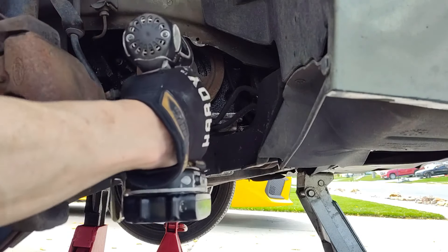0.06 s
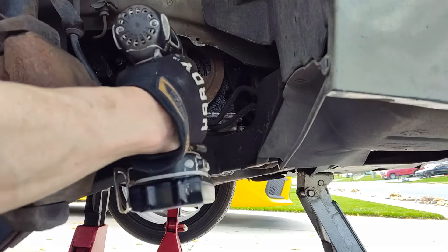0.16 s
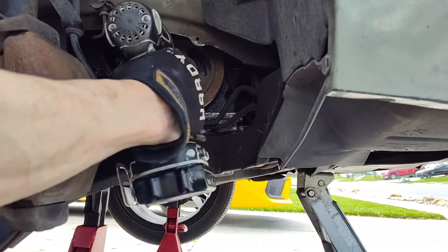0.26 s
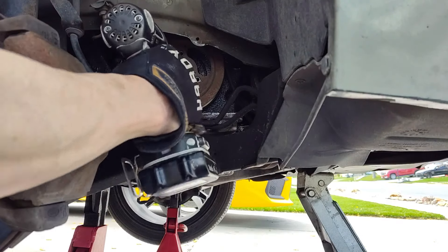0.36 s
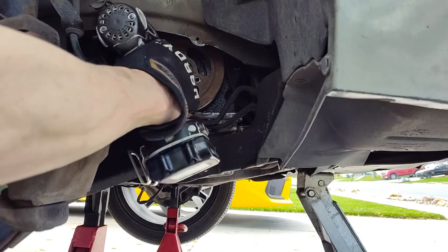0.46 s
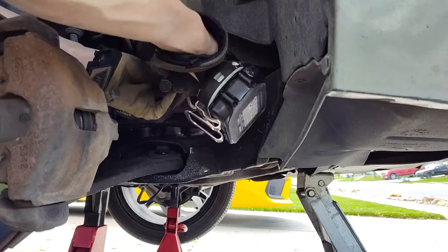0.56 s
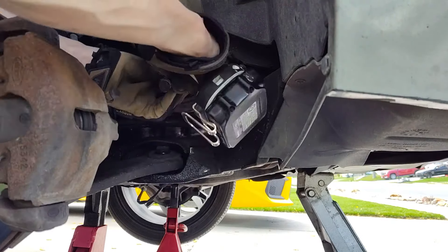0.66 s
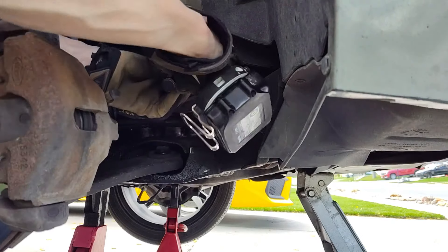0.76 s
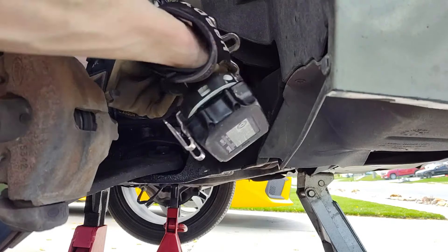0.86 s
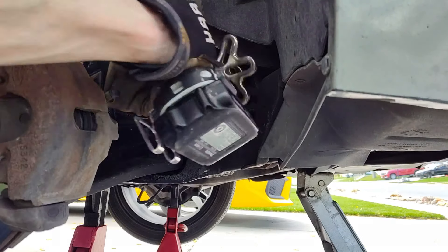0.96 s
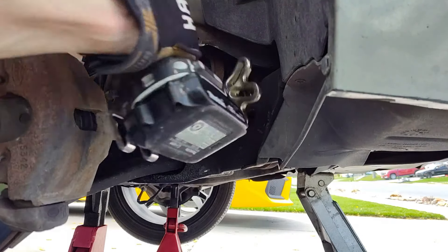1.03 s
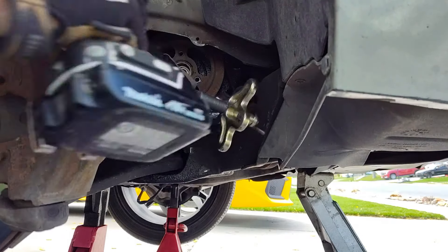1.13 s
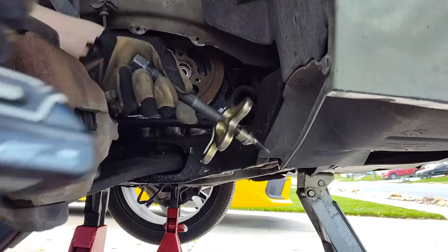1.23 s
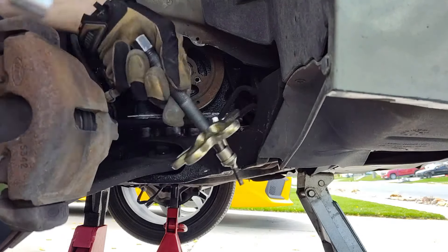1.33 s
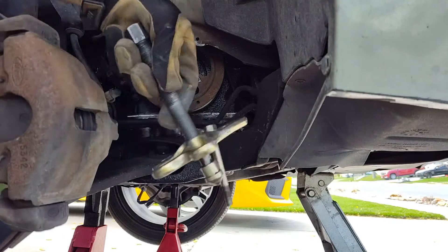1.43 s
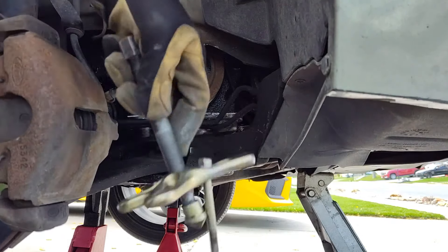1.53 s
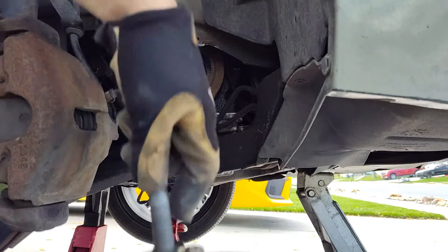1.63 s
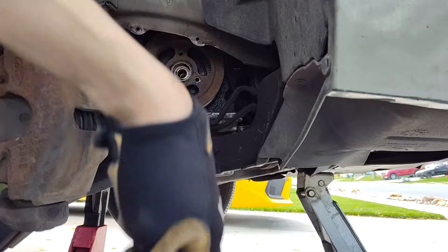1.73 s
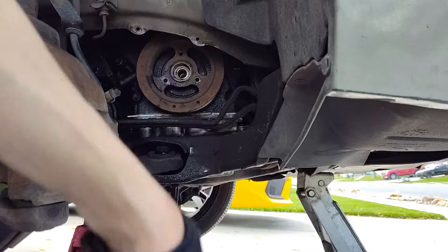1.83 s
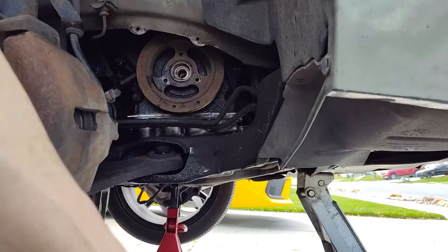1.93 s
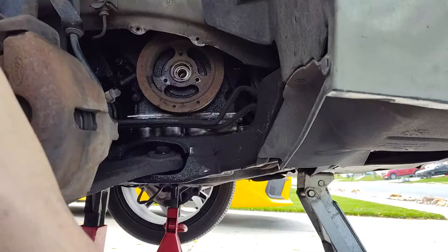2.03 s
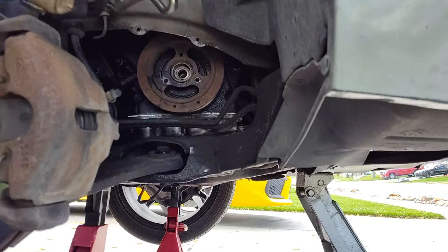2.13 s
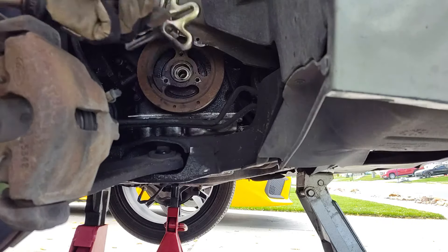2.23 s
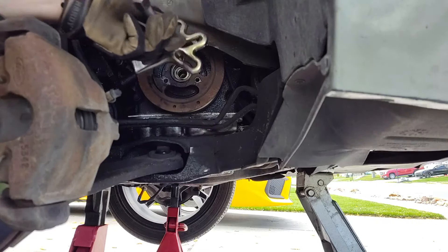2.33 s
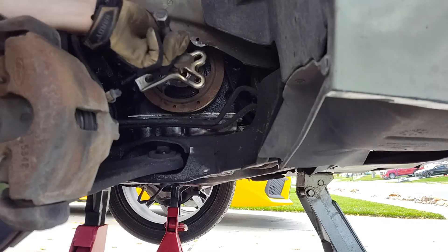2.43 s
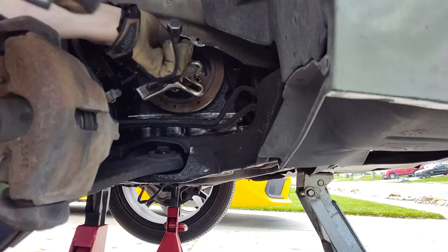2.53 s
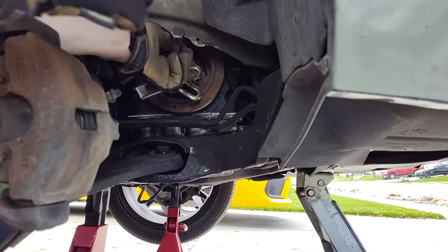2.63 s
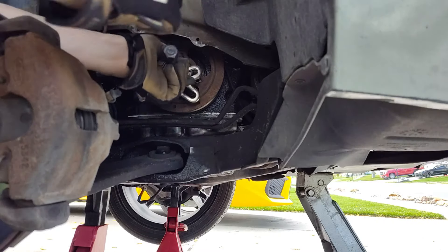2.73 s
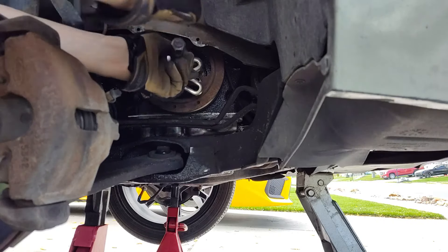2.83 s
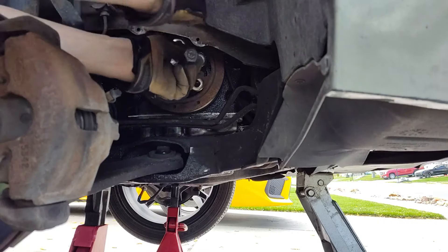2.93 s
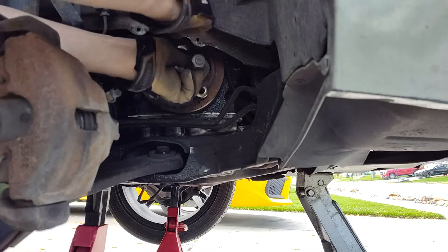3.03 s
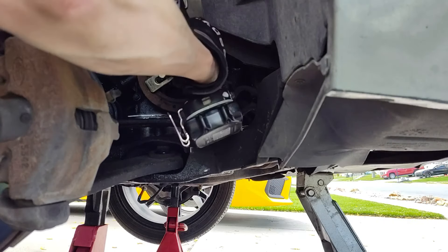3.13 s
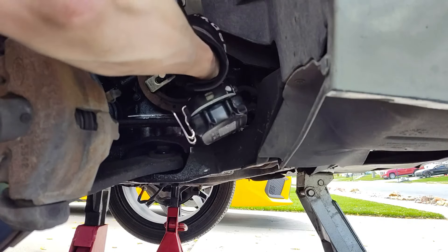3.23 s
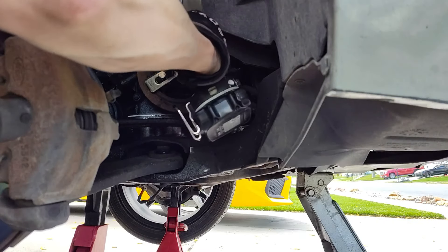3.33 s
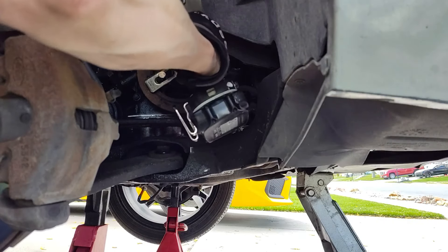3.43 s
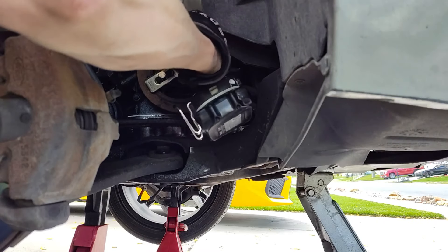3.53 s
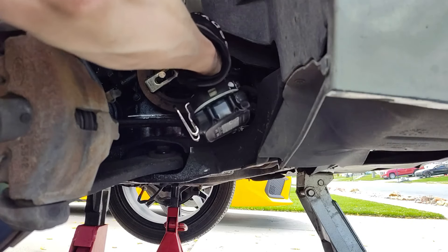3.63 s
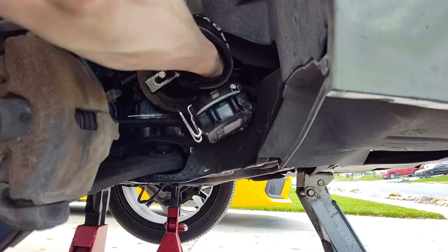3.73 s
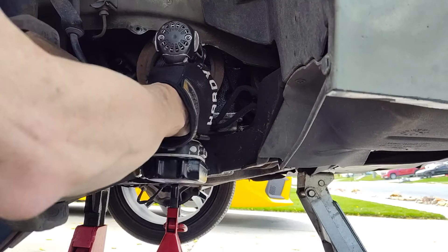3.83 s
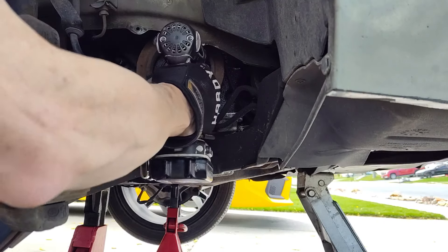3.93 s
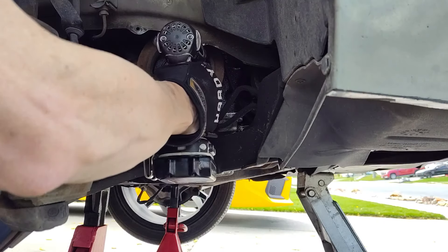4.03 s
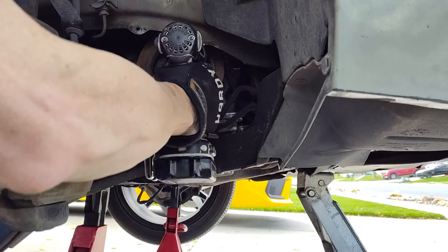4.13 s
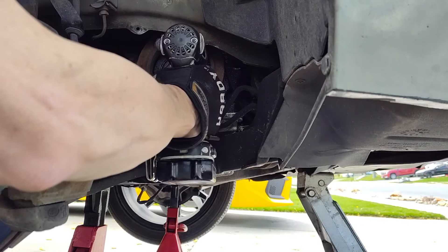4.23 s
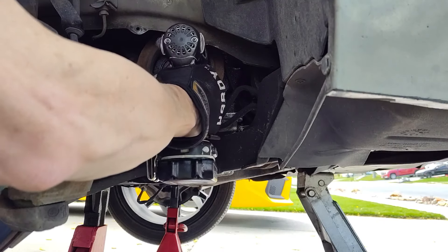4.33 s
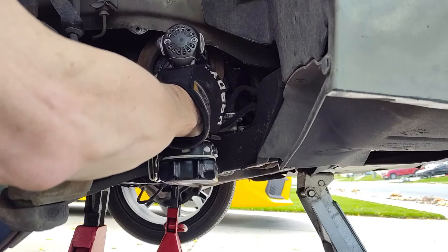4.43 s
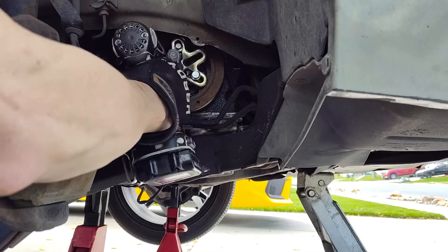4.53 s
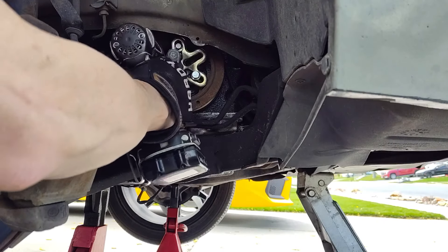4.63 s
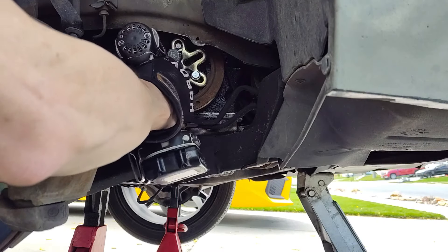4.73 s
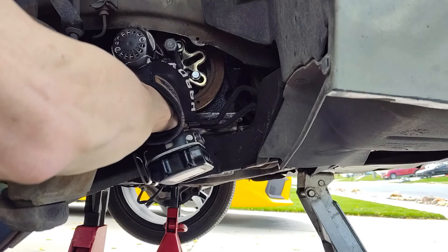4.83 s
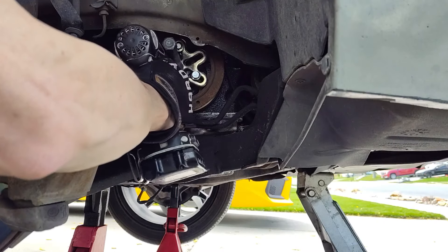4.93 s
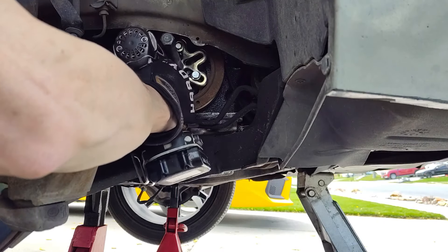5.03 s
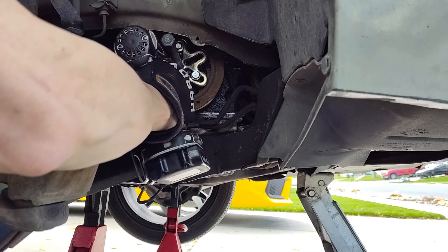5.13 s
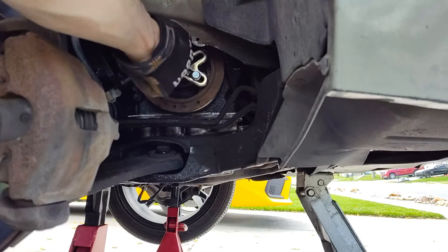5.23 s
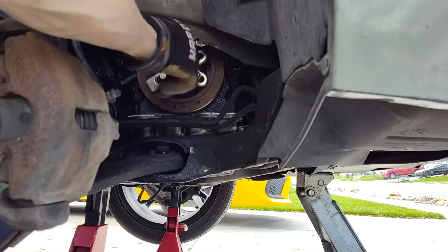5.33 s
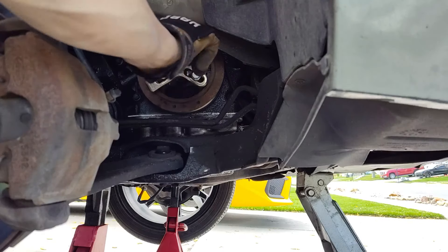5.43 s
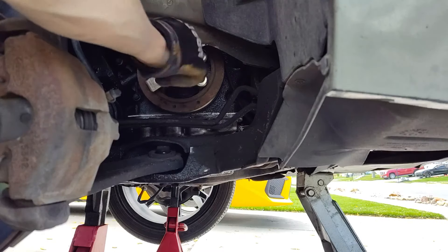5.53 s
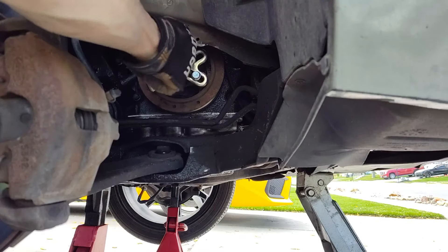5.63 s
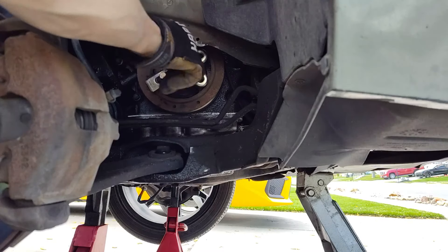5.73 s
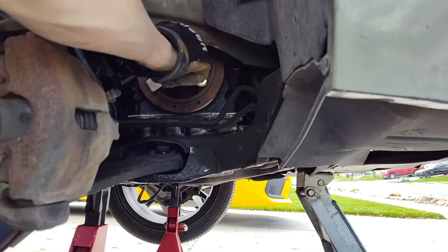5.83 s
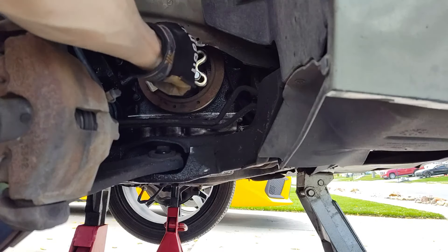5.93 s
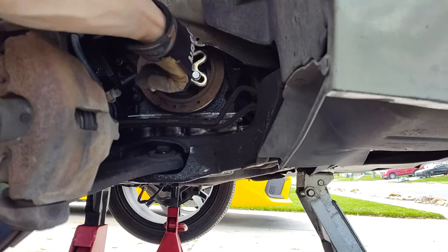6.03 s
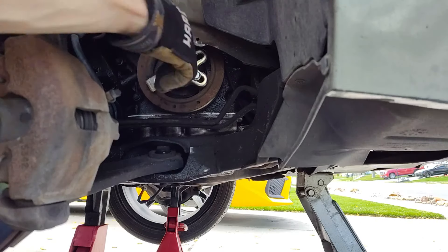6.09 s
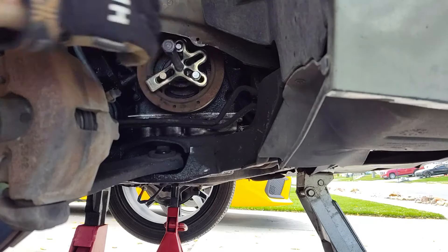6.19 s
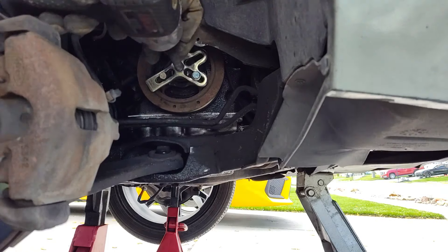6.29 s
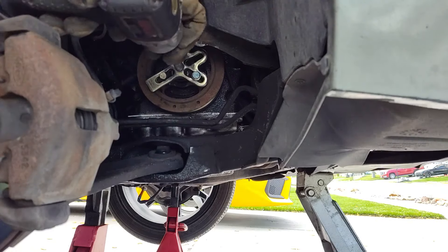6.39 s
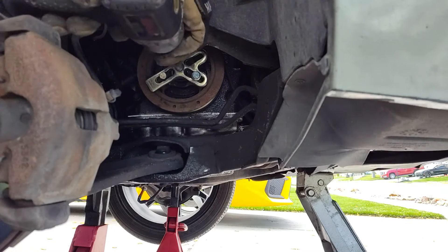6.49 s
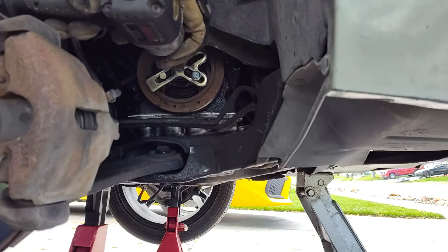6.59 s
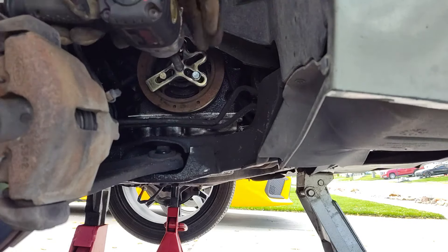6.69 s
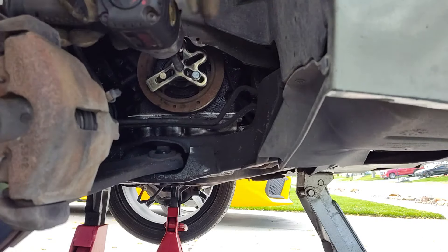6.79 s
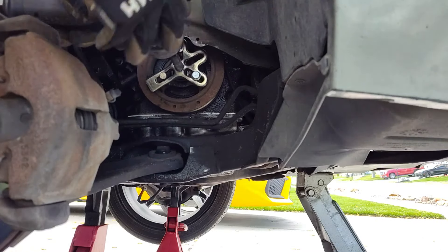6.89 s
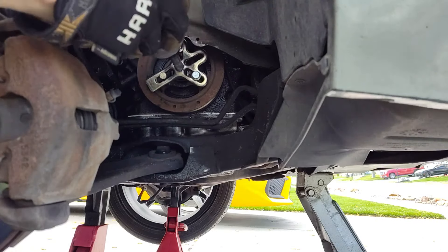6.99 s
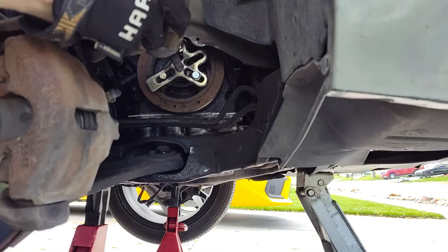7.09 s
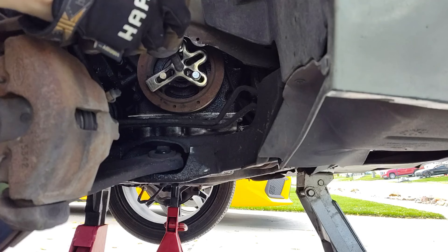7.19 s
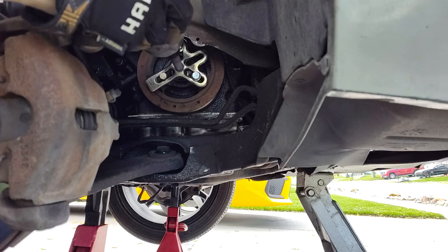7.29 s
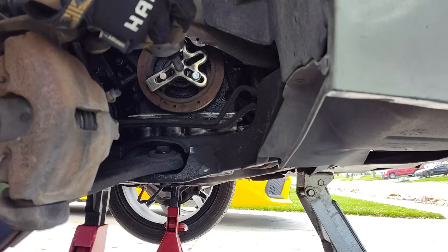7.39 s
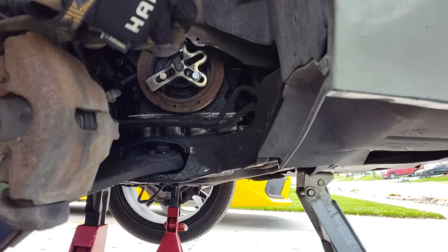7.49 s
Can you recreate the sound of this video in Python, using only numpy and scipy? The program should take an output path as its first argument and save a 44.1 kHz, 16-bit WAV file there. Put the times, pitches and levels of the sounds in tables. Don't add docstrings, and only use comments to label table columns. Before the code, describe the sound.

Close up under a raised car in an open garage, a steel puller's bolts clink and ring brightly while an impact wrench spins up briefly. After a quieter gap with a tool knock, three loud hammering bursts rattle on the bolts. Tools are then handled, a rubber boot creaks, low thuds bump the camera, and the wrench hammers unevenly again. Faint hiss and traffic rumble lie behind.

```python
import sys
import numpy as np
from scipy import signal
from scipy.fft import rfft, irfft, next_fast_len
from scipy.io import wavfile
from scipy.ndimage import uniform_filter1d, map_coordinates

SR = 44100
rng = np.random.default_rng(int(sys.argv[2]) if len(sys.argv) > 2 else 0)


def transcribe(u):
    v = np.clip(np.atleast_2d(u).T, -1, 1)
    q = np.round(v * 32767).astype(np.int16)
    wavfile.write(sys.argv[1], SR, q)


def ratio_of_db(decibels):
    return 10 ** (np.asarray(decibels, float) / 20)


N = 332955


def unit(x):
    return x / np.sqrt(np.mean(x ** 2) + 1e-20)


def along(points, hz):
    f, v = np.transpose(points)
    return np.interp(np.log(hz + 1), np.log(f + 1), v)


def curves(rows, outside=None):
    s, *cols = np.transpose(rows)
    return [np.interp(np.arange(N) / SR, s, c, outside, outside) for c in cols]


def wobble(rate_hz):
    knots = rng.standard_normal(int(N * rate_hz / SR) + 4)
    return map_coordinates(knots, [np.arange(N) * rate_hz / SR])


def filtered(x, response):
    m = next_fast_len(N + 8192)
    return irfft(rfft(x, m) * response(np.fft.rfftfreq(m, 1 / SR)), m)[..., :N]


def resonance(f, center_hz, width_hz):
    return 1j * f * width_hz / (center_hz ** 2 - f * f + 1j * f * width_hz)


def noise():
    return rng.standard_normal((2, N))


def spread(pair, spectrum):
    # hz, left_right_likeness
    likeness = [(40, 0.2), (120, .75), (400, 0.9), (1000, 0.6), (2000, 0.25), (5000, .15), (10000, 0.3)]

    def mid_side(hz):
        turn_rad = np.arccos(np.clip(along(likeness, hz), -1, 1)) / 2
        return ratio_of_db(along(spectrum, hz)) * [np.cos(turn_rad), np.sin(turn_rad)]

    mid, side = filtered(pair, mid_side)
    return unit(np.array([mid + side, mid - side]))


def add(out, s, x):
    part = out[..., round(s * SR):][..., :x.shape[-1]]
    part += x[..., :part.shape[-1]]


def bursts(rows, spike_db, spike_t60=0.017):
    # hz, level_db
    struck = [(50, -57), (120, -5.5), (350, -4.5), (1000, -1), (9000, 1), (11500, -5), (14200, -3.5),
              (14600, -36), (15500, -44), (15800, -120)]
    out, t = np.zeros((2, N)), np.arange(SR // 8) / SR
    for s, db, low_db, t60 in rows:
        rise = 1 - np.exp(-t / (.0009 if db > -30 else .003))
        for lo_hz, hi_hz, part_db, shared in ((348, 3500, low_db, 0.78), (3513, 13000, 0, 0.44)):
            hz = lo_hz + (hi_hz - lo_hz) * rng.random((30, 1)) ** 1.3
            late_s = np.maximum(t - 0.0033 * rng.random((30, 1)), 0)
            decay = ratio_of_db(rng.normal(0, 2, (30, 1)) - 60 * late_s / t60)
            modes = decay * np.sin(2 * np.pi * hz * late_s)
            band = signal.butter(2, [lo_hz, hi_hz], "band", fs=SR, output="sos")
            crackle = signal.sosfilt(band, rng.standard_normal((3, len(t))))
            crackle = 1.17 * (crackle[:2] + shared * crackle[2]) / np.hypot(1, shared)
            crackle *= ratio_of_db(12 - 60 * t / t60) + ratio_of_db(12 + spike_db - 60 * t / spike_t60)
            gains = rng.standard_normal((2, 30)) + shared * rng.standard_normal(30)
            near = gains * .6 / np.hypot(1, shared) @ modes
            add(out, s, ratio_of_db(db + part_db - 25.0) * (near + crackle) * rise)
    return filtered(out, lambda hz: ratio_of_db(along(struck, hz)))


def wrench():
    hits = blows()
    out = gearbox(hits[:, 0]) + free_spins() + hammer(hits) + trigger_click()
    return filtered(out, lambda f: 1 / (1 + (90 / (f + 1)) ** 6))


def gearbox(hit_s):
    # hz, db_per_hz
    gear_colour = [(60, -64), (120, -13), (200, -7.5), (842, -11.5), (1040, 0.5), (1310, 1.5), (1920, 1.5),
                   (2860, 5.5), (6000, -9), (7800, -22), (13200, -120)]
    fizz_colour = [(2060, -31), (3500, -7.5), (3960, -6), (4690, -3), (9950, 2.5), (11600, -6), (13800, -6),
                   (14500, -89), (15500, -110)]
    # press_s, spin_up_s, hold_s, coast_s, gearbox_db
    pulls = [(0.658, 0.09, 0.2, 0.1, -22), (0.906, 0.053, 0.088, 0.086, -33.5),
             (3.208, 0.11, 0.11, 0.021, -33), (3.407, 0.037, 0.29, 0.047, -22),
             (3.911, 0.084, 0.042, 0.058, -29.5), (4.091, 0.027, 0.089, 0.034, -51.5),
             (4.178, 0.048, 0.29, 0.027, -23), (4.533, 0.041, 0.029, .012, -72),
             (4.602, 0.011, 0.13, 0.087, -27.5), (4.813, 0.096, 0.32, 0.049, -24),
             (7.317, 0.039, 0.13, 0.058, -21)]
    # drone_hz, left_minus_right_db, fizz_over_gearbox_db, drone_over_gearbox_db
    grips = [(698, -1, 9, -4.5), (830, -2.5, 11, -6.5), (860, 0.3, 13, -8), (864, 0, 4.5, -9.5),
             (835, 2.5, 3, -15), (812, 3, -9, -6), (790, -1, 6, -11.5), (840, 1.5, 2, -29),
             (855, 1.5, 3.5, -7), (814, 0.5, 6.5, -18.5), (686, -0.9, 7, -10)]
    growls = [0.5, -4.5, 2, 2, -5, 6, 1, -1, -11, -1.5, 4.5]
    # peak_s, gearbox_db, drone_over_gearbox_db
    jolts = [(.672, -14.5, 9), (.94, -58, 10), (3.448, -22, -5), (3.975, -40.5, 1), (4.035, -39, -12),
             (4.046, -30.5, 4), (4.155, -47, 13), (4.227, -20.5, -9.5), (4.622, -24.5, -7),
             (4.733, -26.5, 0.5), (4.926, -15.5, -6), (5.248, -17.5, -19), (7.353, -13, -8)]
    split_hz, jolt_db_per_s, sag_db_per_s = 1900, 467, -5.5
    loud_power = 2.04
    now = np.arange(N) / SR
    body, fizz = spread(ticks(), gear_colour), spread(ticks(), fizz_colour)
    shake = noise() * ratio_of_db(4 * wobble(40))
    gain = rebound(hit_s)
    body, fizz = gain * unit(housing(body)), gain * unit(housing(fizz))
    growl = filtered(body, lambda f: 1 / (1 + (f / split_hz) ** 4))
    jolt = sum(ratio_of_db(db - jolt_db_per_s * np.abs(now - s)) for s, db, _ in jolts)
    lurch = sum(ratio_of_db(db + more_db - jolt_db_per_s * np.abs(now - s)) for s, db, more_db in jolts)
    out = np.zeros((2, N))
    for pull, grip, growl_db in zip(pulls, grips, growls):
        press_s, *stages_s, db = pull
        hz, lean_db, fizz_db, drone_db = grip
        speed = np.interp(now, np.cumsum([press_s, *stages_s]), [0, 1, 1, 0])
        loudness = speed ** loud_power * ratio_of_db(sag_db_per_s * np.clip(now - press_s, 0, 1))
        drone = spread(shake, [(hz / 12, -90), (hz / 3, -40), (hz * 0.69, -14), (hz * 0.85, -11), (hz, 0),
                               (hz * 1.285, -13), (hz * 17.0, -40), (hz * 12, -110)])
        chatter = ratio_of_db(3.5) * (body + (ratio_of_db(growl_db) - 1) * growl)
        steady = ratio_of_db(db) * (chatter + ratio_of_db(fizz_db) * fizz + ratio_of_db(drone_db + 1.0) * drone)
        lean = ratio_of_db([[lean_db / 2], [-lean_db / 2]])
        out += lean * loudness * (steady + jolt * (body + fizz) + lurch * drone)
    return out


def ticks():
    return jangling(4) * ratio_of_db(1.5 * wobble(900) + 1.3 * wobble(70))


def jangling(depth_db):
    z = signal.stft(noise(), nperseg=512)[2]
    flare = uniform_filter1d(rng.standard_normal(z.shape[1:]), size=6, axis=1)
    return signal.istft(z * ratio_of_db(depth_db * unit(flare)), nperseg=512)[1][:, :N]


def housing(x):
    # center_hz, width_hz, level_db
    bands = [(452, 30, 7), (1333, 126, 2), (2914, 250, -1), (2500, 550, -11), (4040, 217, 2),
             (5300, 900, -6), (8030, 1700, -6.5)]
    flutter_db = 1.5
    lifted = 0
    for center_hz, width_hz, db in bands:
        band = filtered(x, lambda f: resonance(f, center_hz, width_hz))
        lifted = lifted + ratio_of_db(db + flutter_db * wobble(35)) * band
    return x + lifted


def rebound(hit_s):
    t = np.arange(N) / SR
    k = np.clip(np.searchsorted(hit_s, t), 1, len(hit_s) - 1)
    gap_s = hit_s[k] - hit_s[k - 1]
    winding = np.clip((t - hit_s[k - 1]) / gap_s, 0, 1)
    hammering = (gap_s < .045) & (t > hit_s[0]) & (t < hit_s[-1])
    return ratio_of_db(np.where(hammering, 1.5 - 12 * winding ** .6, 0))


def free_spins():
    # time_s, mesh_hz
    spins = [
        [(.745, 2190), (.76, 2250), (.81, 2430), (.85, 2520), (.89, 2510), (.925, 2300), (.96, 2140)],
        [(3.295, 1470), (3.308, 1467), (3.322, 1790), (3.34, 1916), (3.36, 2037), (3.388, 2020), (3.408, 2030),
         (3.432, 1720), (3.442, 1500), (3.46, 1494)],
    ]
    tops = [
        -36,
        -33,
    ]
    return housing(sum(whine(spin, top_db) for spin, top_db in zip(spins, tops)))


def whine(spin, top_db):
    # multiple, level_db
    orders = [(.63, -8), (2, 3), (3, 1), (5, 0)]
    db_per_octave = 7
    now, mesh_hz = np.arange(N) / SR, uniform_filter1d(curves(spin)[0], size=500)
    spinning = (now > spin[0][0]) & (now < spin[-1][0])
    level_db = np.where(spinning, top_db + db_per_octave * np.log2(mesh_hz / mesh_hz.max()), -120)
    phase = 2 * np.pi * np.cumsum(mesh_hz * (1 + .003 * wobble(200))) / SR
    return sum(ratio_of_db(level_db + db + 2 * wobble(60)) * np.sin(k * phase) for k, db in orders)


def blows():
    # start_s, peak_db, low_part_db, bolt_ring_db
    trains = [(3.488, -6, -16, -45), (3.5165, -8, -21, -46), (3.545, -3.5, -19, -34),
              (3.5735, -0.5, -9, -35), (3.6037, -6.5, -5, -41), (3.6316, -3, -2, -36),
              (3.6596, -8, -11, -24), (3.69, -4.5, -7, -24), (3.7173, -10, -15, -36),
              (4.2349, -9, -4.5, -34), (4.265, 0.5, -25, -36), (4.2935, -5, -4, -24), (4.322, -1, -19, -30),
              (4.348, -8, -5, -30), (4.376, -2.5, -15, -21), (4.4014, -3.5, -13, -27),
              (4.426, -1, -1.5, -36), (4.45, -5.5, 1, -43), (4.474, 3, -7.5, -38), (4.4978, -6, -12, -36),
              (4.5212, 1, -10, -57), (4.9582, -1.5, -7, -28), (4.9847, -2, -20, -41),
              (5.012, -0.5, -17, -30), (5.0399, -3.5, -9, -30), (5.0638, -11, -16, -42),
              (5.0905, -9, -18, -44), (5.1168, 2.5, -34, -30), (5.141, -2.5, -10, -45),
              (5.1647, -9, -12, -30), (5.1888, -13, -17, -41), (5.216, -6, -27, -39), (5.24, -1.5, -2, -39)]
    # start_s, peak_db, low_part_db
    strays = [(3.441, -21, -9), (3.453, -2, 2), (3.481, -7, -19), (4.1889, -18.5, 9), (4.2035, -27, -7),
              (4.2214, -17.5, 19), (4.2291, -5.5, 2), (4.6098, -21, 22.5), (4.6225, -9.5, 4),
              (4.6458, -4, -3), (4.854, -14.5, 0), (4.918, -2, -24), (4.9248, -21, -17), (4.8765, -15, 7),
              (4.934, -27, -16), (7.342, -33, -7), (7.3671, -7, 9.5), (7.385, 0, -9), (7.4149, -6, 6.5),
              (7.428, -5, -16), (7.451, -1.5, 4), (7.4696, -27, -8), (7.5026, -6.5, -22)]
    rows = [(s, db - 1, low_db, ring_db) for s, db, low_db, ring_db in trains]
    return np.array(sorted(rows + [(*row, -40) for row in strays]))


def hammer(hits):
    # start_s, ring_db
    square = [
        (4.922, -20),
        (4.959, -17),
        (5.013, -17),
        (5.119, -18),
        (5.142, -23),
    ]
    bolt_hz, bolt_t60_s = 8250, .1
    out = bursts([(s, db + 1, low_db, .026) for s, db, low_db, _ in hits], spike_db=11, spike_t60=.009)
    t = np.arange(SR // 8) / SR
    for s, *_, db in [*hits, *square]:
        tone = np.sin(2 * np.pi * bolt_hz * t + rng.random((2, 1)) * 3)
        add(out, s, ratio_of_db(db - 60 * t / bolt_t60_s) * tone)
    return out


def trigger_click():
    # start_s, pitch_hz, level_db, t60_s
    s, hz, db, t60 = (3.226, 2900, -38, .045)
    out, t = np.zeros((2, N)), np.arange(SR // 8) / SR
    add(out, s, ratio_of_db(db - 60 * t / t60) * np.sin(2 * np.pi * hz * t))
    return out


def steel_ring(hz, db, t60):
    tremble_db, wander_rad, port_rad = 2, .03, 1.6
    t = np.arange(SR // 2) / SR
    tremble = tremble_db * np.sin(rng.uniform(124, 270) * t + 6 * rng.random())
    wander = wander_rad * np.cumsum(rng.standard_normal(len(t)))
    tone = np.sin(2 * np.pi * hz * t + wander + port_rad * rng.random((2, 1)))
    return ratio_of_db(db - 60 * t / t60 + tremble) * tone * (1 - np.exp(-t / 0.00023))


def puller():
    # start_s, crack_peak_db, low_ring_db, high_over_low_ring_db
    clinks = [(0.0004, -36, -29, -4), (0.0636, -1, -23, -4), (0.1348, -24, -30, -20), (0.2777, -9, -29, 1),
              (0.29, -14.5, -23, -1), (0.376, -24.5, -32, 1), (0.4274, -31, -44, 11),
              (0.4548, -15, -46, 24), (0.5077, -27, -52, 16), (0.595, -32.5, -61, 16),
              (0.9785, -29.5, -31, 5), (1.06, -20.5, -39, 4), (1.137, -29, -53.5, 9),
              (1.1873, -31.5, -71, 13), (1.2175, -23, -40, 10), (1.279, -10, -32, 13),
              (1.298, -20.5, -27, -25), (1.365, -24, -43, 5), (1.414, -25, -47, 2), (1.599, -33, -51, -5),
              (1.737, -25.5, -50, 3.5), (1.98, -34, -48.5, -7), (2.012, -29, -48, 2.5),
              (2.0387, -33, -56, -4)]
    # pitch_hz, level_db, t60_s
    on_hub = [
        [(4241, -3, .75), (4180, -20, 1)],
        [(8210, 0, 0.1)],
        [(8780, -1, 0.038)],
        [(10935, -4.5, 0.43), (11000, -17, 0.34), (10400, -20, 0.13)],
    ]
    lifted = [
        [(4212, 1, .45), (4236, -10, .4), (5606, -3, .14), (5660, -12, .15), (3460, -12, .07), (4820, -12, .07)],
        [(8232, 0, .2), (7400, -12, .1)],
        [(8904, 0, .1)],
        [(10862, 0, .32), (10812, -6, .45), (10500, -18, .3)],
    ]
    # start_s, ring_db
    long_bolt = [
        (0.0004, -27),
        (0.064, -30),
        (0.278, -19),
        (0.9798, -11),
        (1.06, -20),
        (1.2173, -35),
        (1.28, -21),
        (1.414, -58),
    ]
    short_bolt = [
        (0.0625, -15.5),
        (0.29, -11.5),
        (0.9785, -31),
        (1.136, -40),
        (1.1873, -28),
        (1.217, -23),
        (1.2778, -18.5),
        (1.414, -46),
    ]
    # pitch_hz, level_db, t60_s
    bend = [
        (2067, -22.5, 0.31),
        (2820, -19, 0.047),
        (3350, -42, 0.23),
    ]
    # time_s, level_db
    jingle = [
        (.7, -64),
        (.76, -39),
        (.97, -29),
        (1.03, -28),
        (1.1, -58),
    ]
    bend_at_s, ring_stops_s = .066, .597
    out, t = np.zeros((2, N)), np.arange(SR // 2) / SR
    for s, crack_db, ring_db, high_db in clinks:
        early = s < ring_stops_s
        if early:
            held_s = min([at for at, db, *_ in clinks if at > s and db > -25] + [ring_stops_s]) - s
        else:
            after_s = min([at for at, *_ in clinks if at > s + .025] + [N / SR])
            held_s = min(after_s - s, .085 if crack_db > -21 else .03)
        damp = ratio_of_db(-60 * np.maximum(t - held_s, 0) / (.02 if early else .14))
        for db, family in zip((ring_db, ring_db + high_db), (on_hub if early else lifted)[::3]):
            modes = [steel_ring(hz * (1 + rng.normal(0, 0.00011)), db + rel_db + 8.0 + rng.normal(0, 1.0), t60)
                     for hz, rel_db, t60 in family]
            add(out, s, damp * sum(modes))
    for strikes, hub_modes, free_modes in zip((long_bolt, short_bolt), on_hub[1:], lifted[1:]):
        for s, db in strikes:
            modes = hub_modes if s < ring_stops_s else free_modes
            add(out, s, sum(steel_ring(hz, db + rel_db + 2.5, t60) for hz, rel_db, t60 in modes))
    add(out, bend_at_s, sum(steel_ring(*mode) for mode in bend))
    shaken = noise() * ratio_of_db(5 * wobble(60))
    free = sum(lifted, [])
    steel = filtered(shaken, lambda f: sum(ratio_of_db(db) * resonance(f, hz, 30) for hz, db, _ in free))
    out += ratio_of_db(curves(jingle, -120)[0]) * unit(steel)
    cracks = [(s, db + 4.0, -8 if s < .2 else -14, .06) for s, db, *_ in clinks]
    return out + bursts(cracks, spike_db=-3)


def knocks():
    # start_s, peak_db, low_part_db, t60_s
    touches = [(.001, -48, -1, .5), (.049, -31, -12, .06), (.367, -35, -25, .08), (1.228, -29, -25, .06),
               (1.332, -20.5, -25, 0.15), (2.8077, -19, -12.5, 0.05), (3.914, -30, -2, 0.19),
               (4.071, -36, 20, 0.079), (4.1094, -42, 18, 0.065), (4.151, -40.5, 22.5, 0.053),
               (5.3174, -34, 6, 0.066), (6.3244, -51.5, 12, 0.16), (6.4157, -45.5, 12.5, 0.066),
               (6.569, -24, 8.5, 0.13), (6.597, -36.5, 21.5, 0.046), (6.7266, -32.5, 10.5, .25),
               (6.7489, -9.5, 10.5, 0.066), (6.7665, -22, 13, 0.11), (6.9894, -29.5, -28, 0.27)]
    return bursts(touches, spike_db=11, spike_t60=.03)


def handling():
    # start_s, peak_db, pitch_hz
    thuds = [(2.559, -36, 89.5), (2.849, -38, 107), (5.738, -32, 110), (5.87, -34, 84), (6.073, -46, 86.1),
             (6.158, -37, 91), (6.31, -33, 75.4), (6.511, -34, 142), (6.743, -28, 167), (6.94, -32, 112),
             (7.096, -36, 161), (7.175, -22.5, 105), (7.199, -23.5, 96), (7.298, -23.5, 98.6),
             (7.342, -9.5, 190), (7.355, -10.5, 195), (7.414, -14.5, 150.4), (7.482, -16.5, 130),
             (7.521, -16, 172)]
    out, t = np.zeros((2, N)), np.arange(SR // 8) / SR
    for s, db, hz in thuds:
        level = ratio_of_db(db + 4 - 60 * t / .075) * (1 - np.exp(-t / .005))
        port_rad = [[0], [rng.choice([-.7, .7])]]
        add(out, s, level * np.sin(2 * np.pi * hz * t + port_rad))
    return out


def creak():
    # time_s, slip_rate_hz, resonance_hz, level_db
    slips = [
        (7.08, 163, 1290, -50),
        (7.12, 140, 1425, -43.5),
        (7.17, 220, 1460, -39.5),
        (7.23, 69, 1510, -42.5),
        (7.27, 43, 1550, -52),
    ]
    rate_hz, hz, _ = curves(slips)
    cycle = np.cumsum(rate_hz * (1 + 0.1524 * wobble(87))) / SR % 1
    phase = 2 * np.pi * np.cumsum(hz) / SR

    def rough(knots_hz):
        return np.array([wobble(knots_hz), wobble(knots_hz)])

    tone = (.7 + rough(300)) * np.sin(phase)
    tone += rough(900) * np.sin(1.5 * phase)
    tone += ratio_of_db(-4) * rough(900) * np.sin(2.05 * phase)
    return ratio_of_db(curves(slips, -120)[2]) * (0.5 + np.sin(np.pi * cycle) ** 2) * tone


def outdoors():
    # hz, db_per_hz
    rumble_colour = [(13, -40), (22, -20.5), (102, -2), (231, -12), (325, -27), (395, -31), (500, -20),
                     (650, -87), (1100, -120)]
    street_colour = [(50, -38), (120, -10), (200, 0.5), (519, 0), (1250, -4), (1820, -3), (3700, -9),
                     (4260, -7), (6000, -8.5), (7800, 1.5), (13200, -120)]
    hiss_colour = [(1470, -47), (2500, -19), (2780, -12), (3610, -13.5), (6390, -5.5), (7160, -6),
                   (8470, 3.5), (11300, -7), (14200, -9.5), (15500, -98)]
    # time_s, rumble_db
    traffic = [
        (0.0, -45),
        (0.24, -52.5),
        (0.75, -52.5),
        (1.67, -59.5),
        (2.8, -55),
        (3.3, -56),
        (5.2, -61.5),
        (5.4, -57.5),
        (6.0, -57),
        (7.3, -43.5),
    ]
    # time_s, street_db
    street_levels = [(0.1, -36), (0.23, -48), (1.15, -50.5), (1.4, -46), (2.09, -53.5), (2.11, -58), (3.9, -57),
                     (5.3, -52), (5.45, -56.5), (6.31, -58), (6.33, -52), (6.83, -47.5), (7.16, -42),
                     (7.28, -44.5)]
    # pitch_hz, width_hz, level_db
    hz, width_hz, hum_db = (1375, 22, -74)
    hum_from_s = 4.0
    now = np.arange(N) / SR
    street_db, = curves(street_levels)
    hiss_db = -46 + 0.28 * (street_db - street_db.mean()) - 0.5 * now
    hum = spread(noise(), [(hz - 6 * width_hz, -90), (hz, 0), (hz + 6 * width_hz, -90)])
    hum *= ratio_of_db(hum_db + 4.0) * (now > hum_from_s)
    rumble = ratio_of_db(curves(traffic)[0] + 4.1 * wobble(30)) * spread(noise(), rumble_colour)
    street = ratio_of_db(street_db + 1.2 * wobble(6)) * spread(noise(), street_colour)
    hiss = ratio_of_db(hiss_db + .9 * wobble(12)) * spread(noise(), hiss_colour)
    return rumble + street + hiss + hum


def scene():
    return wrench() + puller() + knocks() + handling() + creak() + outdoors()


def top_cut(x):
    return signal.sosfilt(signal.butter(12, 14550, fs=SR, output="sos"), x)


def record(dry):
    # hz, right_over_left_db
    lean = [(100, 0), (5000, 3), (8500, -6.5), (13000, -4)]
    # hz, left_lead_rad
    leads = [(0, 1.8), (780, -0.7), (1030, -1.18), (3620, 0.3), (3960, 1.3), (6980, 0.3), (15200, -0.76)]

    def ports(hz):
        gain = ratio_of_db(np.outer([-.5, .5], along(lean, hz)))
        return gain * np.exp(1j * np.outer([.5, -.5], along(leads, hz)))

    x = filtered(dry, ports)
    x = x / (1 + np.abs(x) ** 6) ** (1 / 6)
    return top_cut(x)


dry = scene()
out = record(dry)
transcribe(out)
```